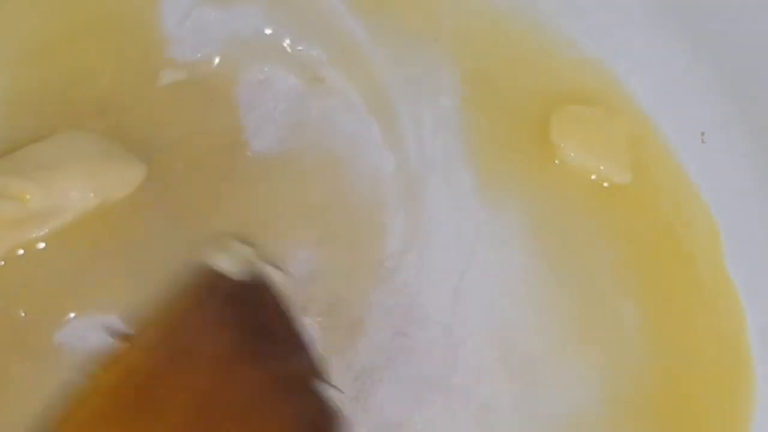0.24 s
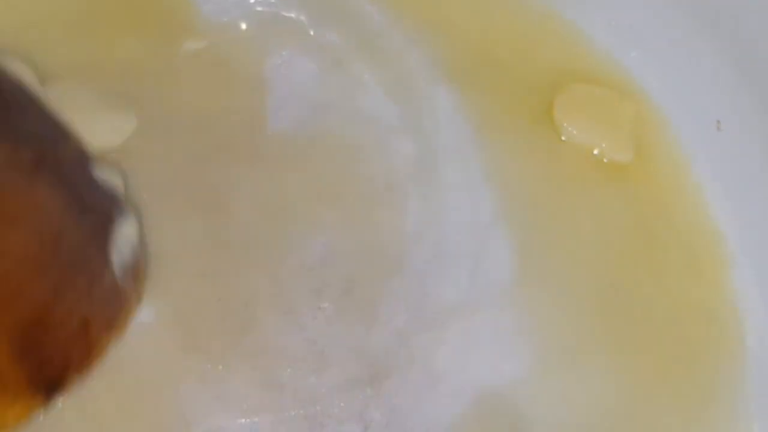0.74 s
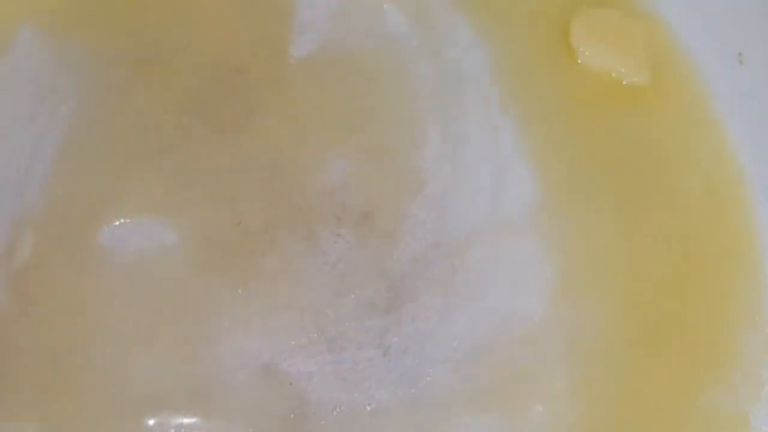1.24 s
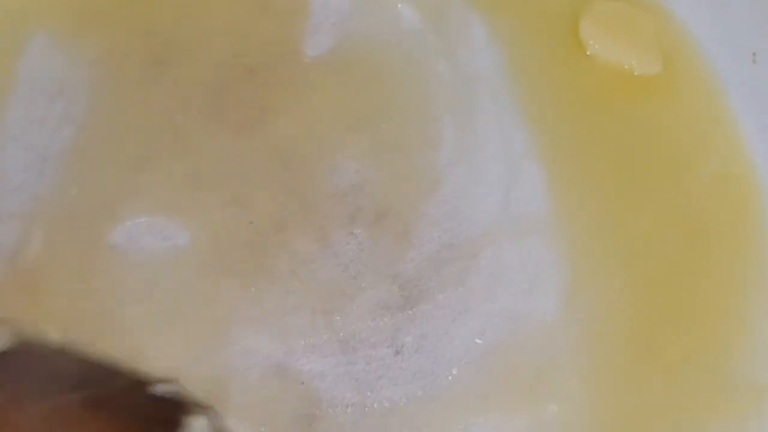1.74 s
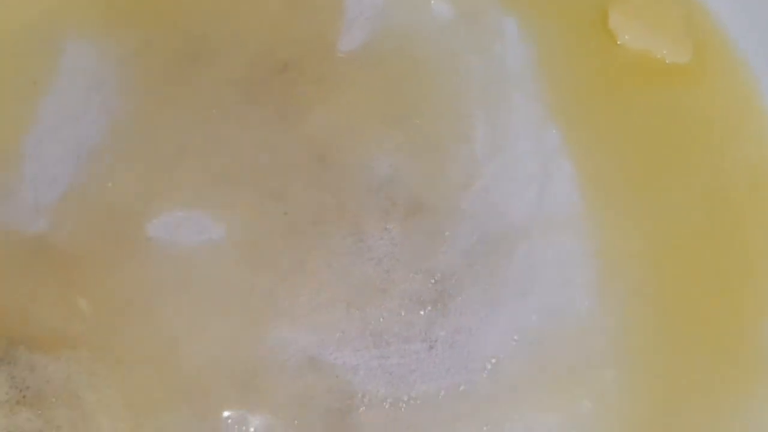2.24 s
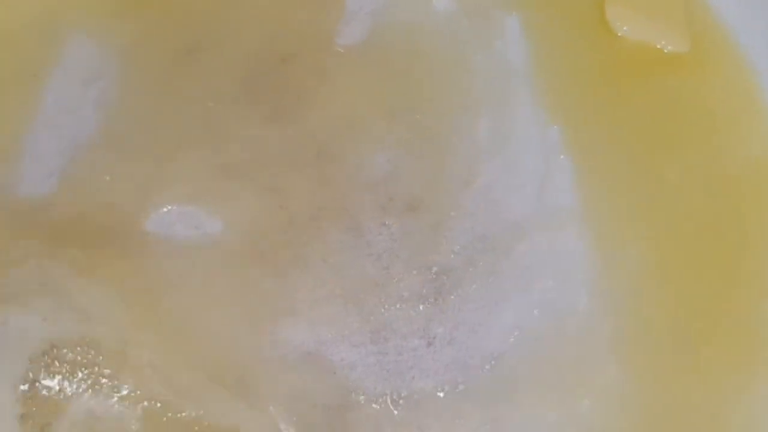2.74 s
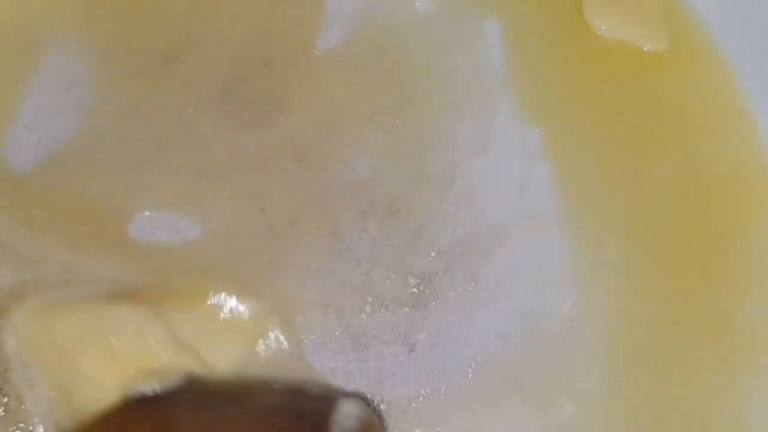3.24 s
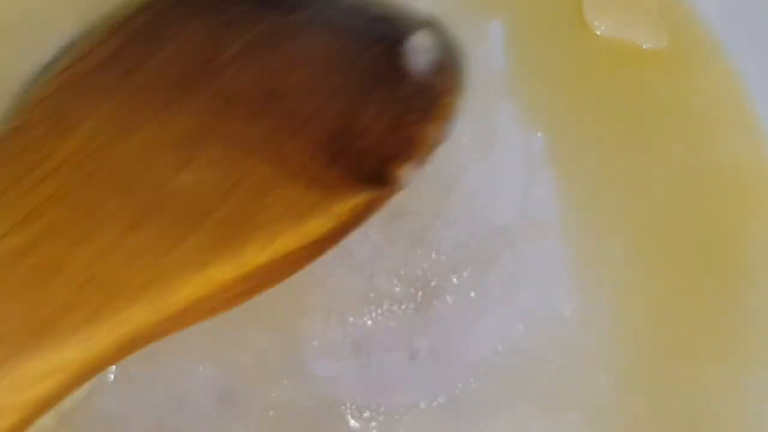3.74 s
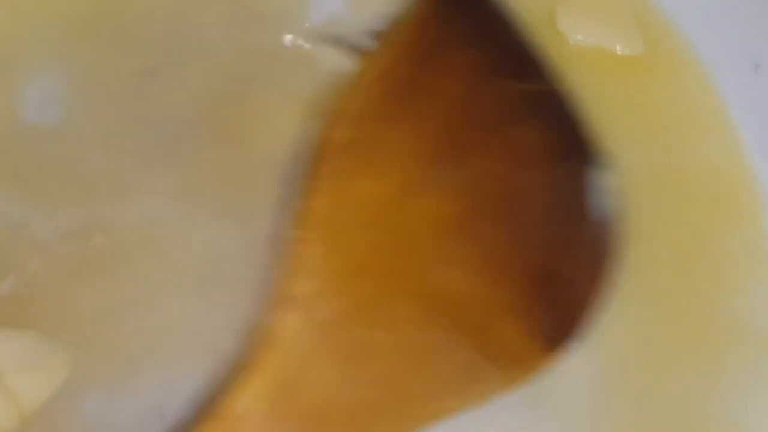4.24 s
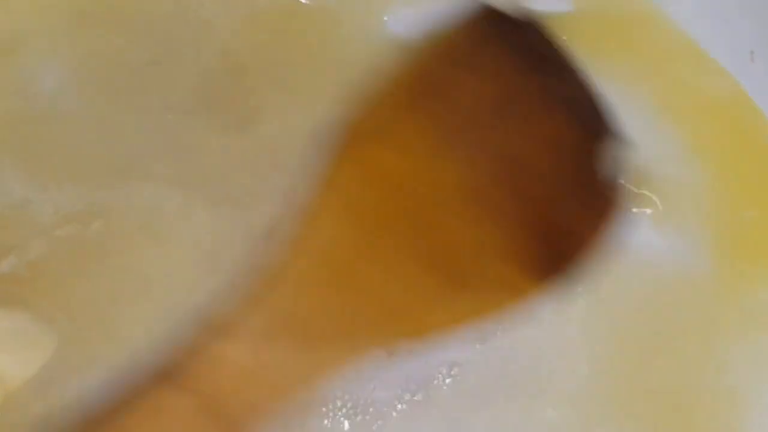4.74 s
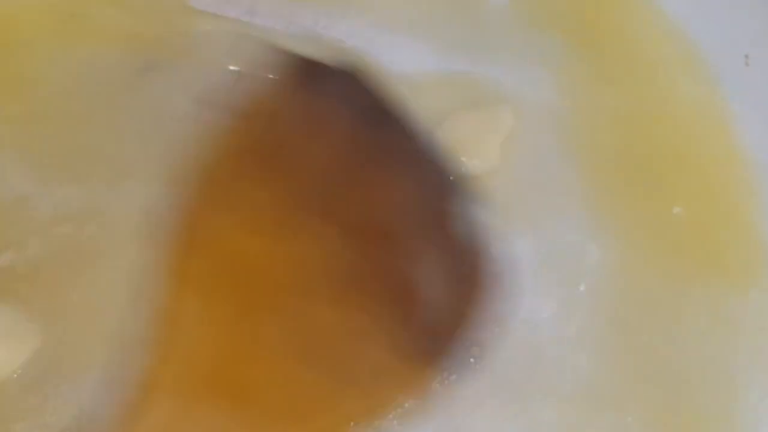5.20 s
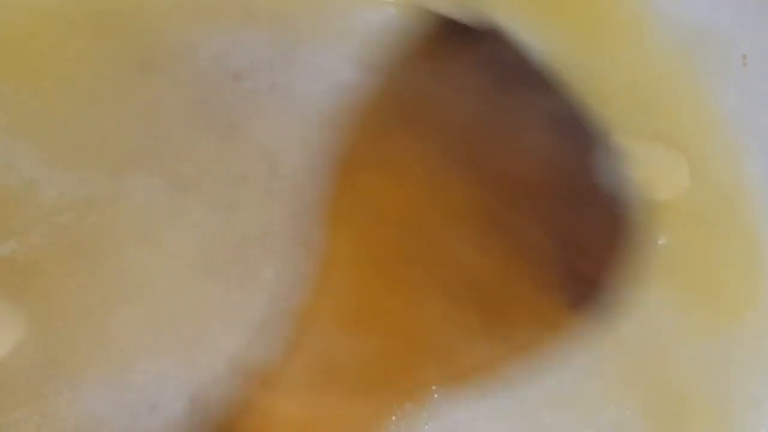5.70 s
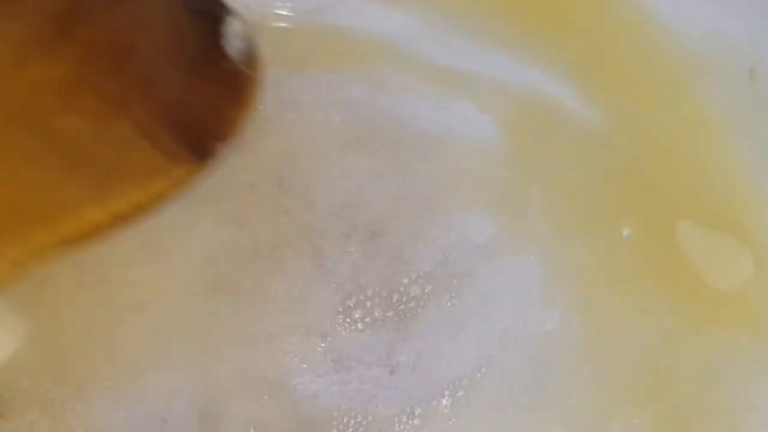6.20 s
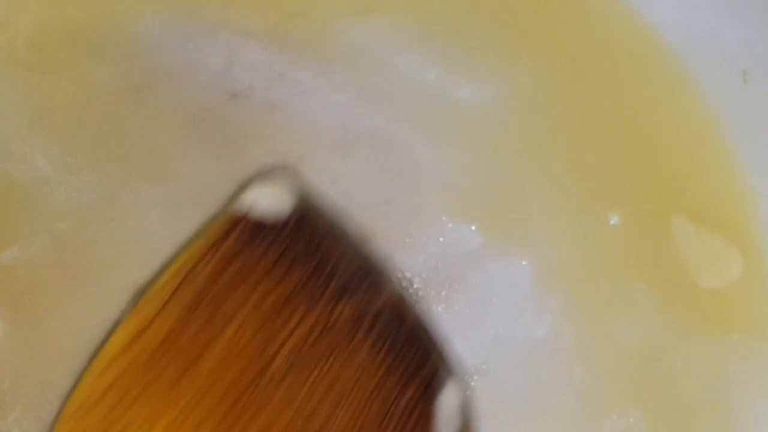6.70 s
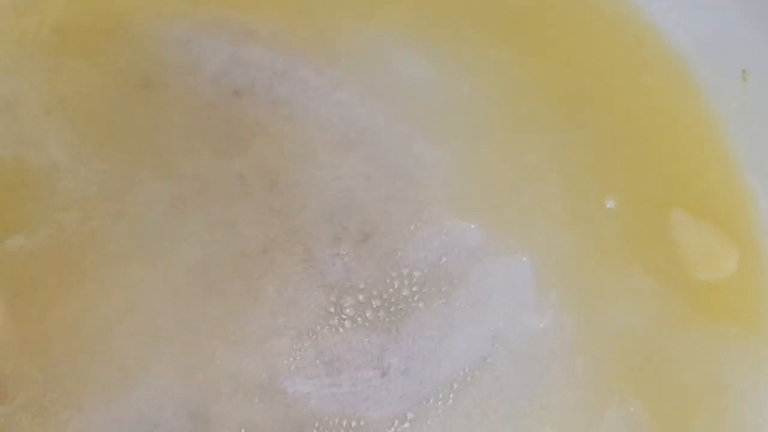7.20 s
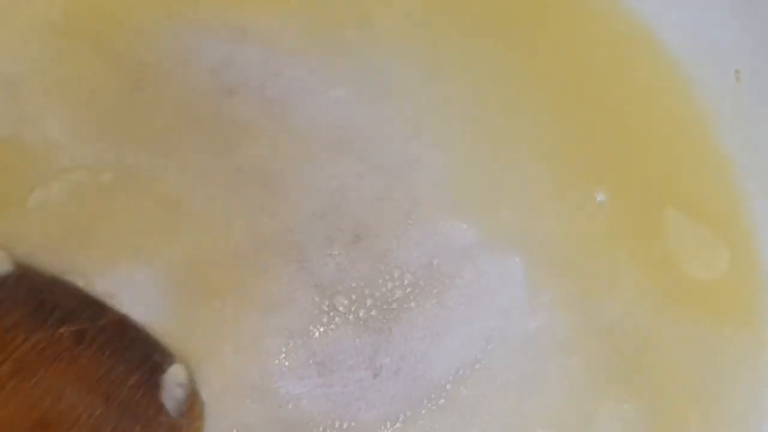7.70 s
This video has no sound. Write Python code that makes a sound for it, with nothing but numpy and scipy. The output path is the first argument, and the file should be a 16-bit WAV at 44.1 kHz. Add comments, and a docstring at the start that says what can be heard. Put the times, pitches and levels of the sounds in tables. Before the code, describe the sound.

Close stereo pickup in a kitchen: a wooden spoon gives short scrapes, then sharp knocks on a pan bottom every third of a second or so, each with a brief damped metallic ring. Soft low floor thuds follow in the middle. Then come quick, regular scraping strokes while stirring, and finally fizzing, ticking fat and a few last knocks. A faint wavering appliance hum and low rumble continue throughout.

```python
"""A wooden spoon knocks on and scrapes across the bottom of a pan of melting butter, close to a stereo camera.
Each knock is a wooden click and thock, the decaying modes of the pan and a burst of grit; the kitchen answers.
Scrapes, and near the end fizzing fat, are shaped noise in strokes and stretches, with a thin squeak along.
The fat ticks as bubbles burst (short rings and snaps), and low thuds come through the floor (decaying modes).
Behind them is shaped noise: room air and the wavering lines of an appliance, with bass that swells and sinks."""
import sys
import numpy as np
from scipy import signal
from scipy.fft import rfft, irfft
from scipy.io import wavfile
from scipy.ndimage import uniform_filter1d

SR = 44100
rng = np.random.default_rng(int(sys.argv[2]) if len(sys.argv) > 2 else 0)


def output_pcm(signal):
    """Save a mono or channel-first signal as 16-bit PCM at the path in sys.argv[1].

    Samples are clipped to [-1, 1] before scaling.
    """
    pcm = np.clip(np.atleast_2d(signal).T, -1, 1) * 32767
    wavfile.write(sys.argv[1], SR, np.round(pcm).astype(np.int16))


N = 350771
LOWEST_HZ, MIDDLE_HZ, UPPER_HZ = 385, 1100, 2800  # where each knock has its own drive of the pan

# likeness of the left and right ports: hz, likeness (1 the same, 0 unrelated)
LIKENESS = [(25, .7), (60, 1), (180, 0.94), (550, .8), (1000, 0), (1650, 0.093), (15000, 0)]
# strokes of the spoon, and near the end stretches of fizzing fat: start_s of full strength,
# hold_s at full strength, relative hiss_db, rub_db (drive of the pan's resonances), treble_db
STROKES = [(.015, 0.018, -59, -14, 2), (0.107, 0.042, -53, 10.5, 2.5), (.2, 0.039, -52.5, 14, -3.5),
           (.24, 0.015, -66, 5, 3), (.512, 0.01502, -58.5, -5.5, 4.5), (.55, .07, -59.5, 9, -3),
           (0.951, 0.059, -59, -1, 5.5), (1.29, 0.06, -59, 16, -1.5), (1.66, 0.16, -63, -5, -24),
           (2.12, 0.39, -67.5, -4, 6.5), (2.52, 0.052, -58, 13, -2), (2.66, 0.23, -63, 3.5, 5.5),
           (2.92, .16, -62.5, 4, 1), (3.2, 0.12, -71.5, -7.5, 1.5), (3.7, .25, -73, -9, -1.5),
           (3.98, 0.035, -66.5, -10, 0.5), (4.099, 0.035, -53.5, 10.5, -2), (4.4, .03, -66, 16, 6),
           (4.49, 0.042, -60, 5, 4.5), (4.608, 0.024, -54.5, 13.5, -0.5), (4.69, 0.06, -60, 6, -5),
           (4.789, 0.029, -50, 7.5, -1.5), (4.915, 0.025, -53.5, 10.5, -0.5), (5.057, 0.043, -51, 9, 2),
           (5.198, 0.03, -53.5, 10.5, 0.5), (5.347, 0.025, -48.5, 7.5, 1), (5.478, 0.036, -53, 7, -1.5),
           (5.629, 0.021, -51.5, 7.5, -0.5), (5.76, 0.047, -57.5, 1, -0.5), (5.895, 0.033, -52, 7.5, 2),
           (6.015, 0.058, -54, 14, 0), (6.158, 0.032, -49.5, 6.5, 2.5), (6.308, 0.0099, -49, 8, 1.5),
           (6.416, 0.024, -47, 6, 2), (6.526, 0.013, -50, 11.5, 1.5), (6.62, .1, -67.5, 0.5, -8),
           (7.12, .15, -66.5, -17, -5), (7.33, 0.042, -62, 8, 3.5), (7.45, .2, -70, -6, 1.5),
           (7.7, .15, -62.5, 0, -6)]


def gain_of(db):
    """Decibels to an amplitude factor."""
    return 10 ** (np.asarray(db) / 20)


def evened(x):
    """Scale to an rms of one."""
    return x / np.sqrt(np.mean(x ** 2) + 1e-20)


def read(points, hz):
    """Read a curve of (hz, value) points, straight between them over log frequency."""
    f, value = np.transpose(points)
    return np.interp(np.log(hz + 1), np.log(f + 1), value)


def add(mix, s, sound):
    """Lay a sound into the mix at s seconds, cut off at the end."""
    part = mix[:, max(round(s * SR), 0):][:, :sound.shape[1]]
    part += sound[:, :part.shape[1]]


def bumps(peaks, hz):
    """Summed power of resonances given as (hz, width_hz, db)."""
    return sum(gain_of(db) ** 2 / (1 + (2 * (hz - f) / width) ** 2) ** 2 for f, width, db in peaks)


def partner(first, other, same):
    """Mix in an unrelated signal so that the second port is like the first by the share `same`."""
    return same * first + np.sqrt(1 - same ** 2) * other


def noise(gain, size, patchy_db):
    """Two-port noise from random short-time spectra; gain(hz, s) shapes it, patches drift over it."""
    frames = 4 * N // size + 5
    hz = np.fft.rfftfreq(size, 1 / SR)[:, None]
    a, b, c, d, patches = rng.standard_normal((frames, len(hz), 5)).T
    patches = uniform_filter1d(patches, size // 100, axis=0)  # smooth over frequency, then over time
    patches = evened(uniform_filter1d(patches, 10000 // size, axis=1))
    same = np.clip(read(LIKENESS, hz), -1, 1)
    left = a + 1j * b
    spectra = np.array([left, partner(left, c + 1j * d, same)])
    spectra *= gain(hz, np.arange(frames) * size / 4 / SR) * gain_of(patchy_db * patches)
    return signal.istft(spectra, nperseg=size, noverlap=3 * size // 4)[1][:, :N]


def ring(hz, t60, t, phase=0):
    """A mode struck at time zero, a sine that falls 60 dB in t60 seconds."""
    return (t > 0) * gain_of(-60 * abs(t) / t60) * np.sin(2 * np.pi * hz * t + phase)


def hum():
    """Room air with the wavering lines of an appliance; the bass swells and sinks."""
    # spectrum of the room air: hz, relative level_db
    air = [(15, -44), (32, -17), (45, -6), (100, -5.5), (180, -17), (330, -11.5), (420, -19), (1200, -27.5),
           (2050, -32.5), (2350, -39.5), (3900, -43.5), (4800, -33.5), (7300, -36.5), (8400, -47),
           (11000, -40), (15700, -43.5), (16000, -72)]
    # lines of the appliance: hz, width_hz, level_db over the air
    lines = [(49, 10, 6), (102.2, 18, 12.5), (150.4, 8.8, 12), (203.1, 17, 9.5), (239.6, 19, 8.5),
             (294.4, 20, 7.5), (336, 9.2, -4.5), (575, 90, 0.5), (1840, 203, 4.5)]
    # swell of the bass, used about its mean: time_s, level_db
    rumble = [(0.0, -52), (0.5, -51.5), (0.91, -50.5), (1.22, -57), (1.62, -50), (1.97, -56.5), (2.41, -50),
              (3.23, -51.5), (3.45, -58.5), (3.72, -52.5), (4.32, -52), (5.09, -54), (5.62, -54.5),
              (5.89, -54), (6.9, -57), (7.22, -55), (7.79, -53), (7.95, -56)]
    s, db = np.transpose(rumble)

    def gain(hz, t):
        swell_db = (np.interp(t, s, db) - np.mean(db)) / (1 + (hz / 900) ** 2)
        # the deepest rumble is stronger on the left
        lean_db = np.reshape([1., -1.], (2, 1, 1)) * 1.2 / (1 + (hz / 90) ** 2)
        return gain_of(read(air, hz) + swell_db + lean_db) * np.sqrt(1 + bumps(lines, hz))

    return gain_of(-48.5) * evened(noise(gain, 4096, 0.43))


def thud(row):
    """A soft low blow through the floor that the room holds for a moment, with a dull rattle on top."""
    s, level_db, hz = row
    t = np.arange(SR // 2) / SR
    body = ring(hz, 0.091, t) + .5 * ring(1.506 * hz, 0.23, t) + 0.15 * ring(0.92 * hz, 1.0, t)
    band = signal.butter(2, [180, 800], "band", fs=SR)
    rattle = signal.lfilter(*band, rng.standard_normal((2, len(t))))
    rattle = rattle + 0.54 * rattle.sum(0)  # draws the two ports together
    rattle = evened(rattle) * gain_of(-24.5 - 60 * t / 0.23)
    soft_onset = 1 - np.exp(-t / 0.0077)
    return s, gain_of(level_db) * (body + rattle) * soft_onset


def kitchen(x):
    """Sparse echoes of random sign, each band dying at its own speed; the ports share the bass."""
    # decay of the kitchen: hz, t60_s
    decay = [(250, 0.403), (600, 0.54), (1500, 0.32), (3000, 0.28), (6000, 0.11), (12000, 0.65)]
    taps = np.zeros((2, SR // 2))
    slots = np.arange(200, SR // 2 - 20, 20)  # one tap in every 20 samples
    at = slots + rng.integers(0, 20, (2, (SR // 2 - 201) // 20))
    np.put_along_axis(taps, at, rng.choice([-1., 1.], at.shape), 1)
    hz, t, (a, b) = signal.stft(taps, SR, nperseg=256)
    same = np.clip(read(LIKENESS, hz), -1, 1)[:, None]
    spectra = np.array([a, partner(a, b, same)])
    fade = gain_of(-60 * t / read(decay, hz)[:, None])
    tail = signal.istft(spectra * fade, SR, nperseg=256)[1]
    return signal.fftconvolve(x, tail / np.linalg.norm(tail[0]), axes=1)[:, :N]


def tick(row):
    """A bubble in the fat bursts: a short ring and a thin, bright snap."""
    s, level_db, hz, sharp_db, left_right_db = row
    t = np.arange(800) / SR
    snap = evened(np.diff(rng.standard_normal(len(t) + 3), 1)[2:])  # differencing thins the noise
    snap = snap * gain_of(sharp_db + 0.5 - 60 * t / .003)
    bubble = gain_of(-3.) * ring(hz, .0035, t) * (1 - np.exp(-t / .0002))
    level = gain_of(level_db + np.array([[.5], [-.5]]) * left_right_db)
    return s, level * (snap + bubble)


def ports(x):
    """The camera body shades each port differently, and the right one is farther from the pan."""
    # lean of sound from the pan's side: hz, left_right_db
    lean = [(60, 0), (300, 3.5), (700, 3.5), (1300, -0.5), (2400, -1), (4300, -7.5), (6000, -5.5),
            (8100, 1), (15000, -1.5)]
    lag_samples = 13
    hz = np.fft.rfftfreq(2 * 256, 1 / SR)
    side = np.array([[.5], [-.5]])
    lag = lag_samples * hz ** 2 / (hz ** 2 + 450 ** 2)  # long waves wrap round the body, almost together
    response = gain_of(side * read(lean, hz)) * np.exp(2j * np.pi * side * lag * hz / SR)
    taps = np.roll(irfft(response), 256, axis=1)
    return signal.oaconvolve(x, taps, axes=1)[:, 256:256 + N]


def sliding(t):
    """Power of each stroke or stretch of fizz over time: it rises, holds and falls."""
    # it is 10 dB down this long before and after the hold, plus a share of the hold:
    # half the coast share before it, the whole share after it
    rise_s, fall_s, coast = 0.028, 0.045, 0.1
    start, hold, hiss_db = np.transpose(STROKES)[:3, :, None]
    hold = abs(hold)
    early = np.maximum(start - t, 0) / (rise_s + .5 * coast * hold)
    late = np.maximum(t - start - hold, 0) / (fall_s + coast * hold)
    return gain_of(hiss_db - 10 * (early + late) ** 1.5) ** 2


def squeak():
    """One mode of the pan keeps singing along with the hiss, thin and unsteady."""
    mode_hz, width_hz, level_db = 2470, 70, -20.5  # level against the hiss_db of the strokes
    t = np.arange(N) / SR
    coarse = t[::128]
    unsteady = evened(uniform_filter1d(rng.standard_normal(len(coarse)), 24))
    strength = np.sqrt(sliding(coarse).sum(0)) * gain_of(6. * unsteady)
    r = np.exp(-np.pi * width_hz / SR)
    # slow complex noise, carried up to the mode's pitch
    waver = signal.lfilter([1], [1, -2 * r, r ** 2], rng.standard_normal((N, 2)) @ [1, 1j])
    song = evened((waver * np.exp(2j * np.pi * mode_hz * t)).real)
    return song * gain_of(level_db) * np.interp(t, coarse, strength)


def scrape():
    """Wood on greased metal hisses and drives broad pan resonances; late fizz of the fat uses the same noise."""
    # spectrum of the hiss: hz, relative level_db
    hiss_curve = [(2060, -30), (3500, -12), (4500, -5), (5580, -8), (6960, -3), (8100, -12.5), (9540, -8.5),
                  (11000, -4), (13600, -6.5), (15000, -5), (15800, -24.5)]
    # resonances of the pan under the edge: hz, width_hz, relative level_db
    rub_peaks = [(2734, 350, -13.5), (3240, 300, -10.5), (1900, 220, -12.5), (800, 1500, -14.5)]
    treble_hz = 8640  # where the treble of the hiss begins
    rub_lag_s = 0.0075  # the resonances follow the hiss by this much
    rub_db, treble_db = np.transpose(STROKES)[3:]
    # the resonances sit a little apart from row to row
    shift = 1 + .05 * rng.standard_normal(len(STROKES))

    def gain(hz, t):
        shelf_db = treble_db / (1 + (treble_hz / (hz + 1)) ** 6)
        hiss = gain_of(read(hiss_curve, hz) + shelf_db) ** 2
        rub = bumps(rub_peaks, hz * shift) * gain_of(rub_db) ** 2
        return np.sqrt(hiss @ sliding(t) + rub @ sliding(t - rub_lag_s))

    grain = gain_of(1.7 * evened(uniform_filter1d(rng.standard_normal(N), 130)))  # uneven level
    rasp = noise(gain, 512, 2.3)
    return gain_of(-11.5) * grain * rasp


def knock(row):
    """The spoon clicks and thocks; the pan rings in the modes that this spot of the bottom drives."""
    # modes of the pan, before damping and splitting: hz, relative level_db, t60_s
    modes = [(314, -21, .2), (386.1, 7.5, 0.3), (524, -0.5, 0.17), (633, 5.5, 0.24), (787, -1, 1),
             (856, 3, 0.23), (974, 1, 0.2), (1130, -2, 1), (1326, 4.5, .22), (1490, -6, .22),
             (1570, -15, 0.29), (1806, 3.5, 0.22), (1702, 2, .2), (1987, -0.5, .2), (1986, 2, 0.073),
             (2140, 0, 0.84), (2330, -18.5, 0.15), (2580, -1, 0.6), (2370, 6.5, 0.16), (2538, -5, 0.3),
             (2750, -3, 0.22), (3210, -11, 0.25), (3343, -12.5, 0.15), (3520, -1.5, 0.082),
             (4110, -12.5, .25), (4450, -20, 0.083), (4820, -15, 0.095), (4770, -6, 0.18),
             (6900, -8.5, .13), (6900, 4.5, 0.0426)]
    # how the dense high modes reach the camera: hz, level_db
    sheen = [(200, -31.5), (340, -9.5), (450, -4.5), (1100, 0), (2250, 1.5), (2600, -4), (3600, -9),
             (4500, -1.5), (5700, -0.5), (7200, 4.5), (8200, -1), (11000, 3.5), (16000, -10.5)]
    # how a blow drives the pan: hz, flat_db for the flat bowl, edge_db for the edge
    blow_curve = [(600, -11, -18), (MIDDLE_HZ, -7.5, -19), (1850, -17.5, -15), (UPPER_HZ, -35, -11),
                  (5000, -52.5, -11), (10000, -63, -26.5)]
    lead_s = 0.002  # the grit swells for 2 ms before the click
    longest_s, split_share = .24, .009  # butter damps every ring; the uneven bottom splits each mode
    (s, blow_db, hard, low_db, middle_db, upper_db,
     click_hz, click_db, tip_hz, thock_hz, thock_db) = row
    drive = [(LOWEST_HZ, low_db)]
    for f, flat_db, edge_db in blow_curve:
        extra_db = middle_db * (f == MIDDLE_HZ) + upper_db * (f == UPPER_HZ)
        drive.append((f, flat_db + hard * (edge_db - flat_db) + extra_db))
    t = np.arange(SR // 3) / SR
    late = t - lead_s
    after = np.maximum(late, 0)

    hz, db, t60 = np.tile(np.transpose(modes), 3)  # each mode splits in three
    spot, turn, split = rng.standard_normal((3, len(hz)))
    hz = hz * (1 + split_share * split * np.clip(hz / 900, .5, 1))
    t60 = np.minimum(t60, longest_s * (1 + (170 / hz) ** 2))
    skew = turn * np.clip(hz / 2500, 0, 2)  # each mode radiates its own way, so the ports differ in phase
    sizes = gain_of(db + read(drive, hz) + 2.7 * spot - 15.5) * np.exp(1j * np.outer([-.5, .5], skew))
    spins = np.exp(np.outer(2j * np.pi * hz - np.log(1000) / t60, after))
    pan = (sizes @ spins).imag * np.tanh(after / .003)

    # noise stands for the dense high modes
    f = np.fft.rfftfreq(len(t), 1 / SR)
    shape = gain_of(read(drive, f) + read(sheen, f))
    a, b = rfft(rng.standard_normal((2, len(t)))) * shape / np.sqrt(f + 50)
    same = np.clip(read(LIKENESS, f), .4, 1)
    grit = irfft([a, partner(a, b, same)], len(t))
    burst = gain_of(3.0 - 60 * abs(late) / 0.016)  # a short swell of noise, then its fall
    tail = gain_of(-14.5 - 60 * late / 0.074) + gain_of(-11.0 - 60 * late / 0.22)
    grit = gain_of(47.0) * grit * (burst + (late > 0) * tail)

    click = gain_of(click_db + 14.5) * ring(click_hz, .013, late)
    tip = gain_of(read(drive, tip_hz) + 13.0) * ring(tip_hz, .012, late)
    click = (click + tip) * np.tanh(late / 0.00031)
    # the spoon's bowl, a dull wooden mode
    thock = gain_of(thock_db + 7.5) * ring(thock_hz, 0.049, late) * np.tanh(late / .001)
    return s, gain_of(blow_db) * (pan + grit + click + thock)


def scene():
    """Pan and spoon through the camera's ports, with ticks, thuds, echoes and the room behind."""
    # knocks: start_s, relative blow_db, hardness (0 flat bowl, 1 edge), low_db (drive of the lowest mode),
    # middle_db and upper_db (extra drive near 1 and 3 kHz), click_hz, click_db, tip_hz, thock_hz, thock_db
    knock_rows = [(0.007, -34.5, 0, 2.5, -4.5, -1, 1410, -26, 5400, 640, -12),
                  (0.486, -10.5, 0.91, -18.5, 5, 1.5, 3150, -7.5, 4430, 562, -14.5),
                  (0.663, -37, 0.75, -21, 6, -1.5, 1230, -16.5, 4970, 490, -29),
                  (0.903, -31.5, 0.38, -16, 3.5, 2, 1400, -26, 4440, 540, -1.5),
                  (1.247, -16, 0.87, -15.5, -2.5, 2.5, 2070, -35, 4565, 767, -25),
                  (1.253, -19.5, 0.4, -9, -3, 5, 2760, -12.5, 4340, 560, -11.5),
                  (1.604, -15.5, 1.016, -44, -8, 3.5, 1590, -3.5, 5110, 900, -16),
                  (1.656, -35.5, .7, -6.5, -4, 11, 1700, -26, 4180, 492, 2.5),
                  (2.087, -23.5, 1.054, -13.5, 1, -1, 2340, -6.5, 4230, 490, -21),
                  (2.479, -21.5, 0.94, -13, -2.5, -5.5, 2240, -10.5, 6840, 506, -22.5),
                  (2.866, -19.5, 0.93, -17.5, -3, 2, 1570, -17, 4940, 663, -55),
                  (4.061, -22, 0.62, -23.5, 1, 4.5, 1900, -8.5, 4950, 560, -9),
                  (4.408, -38.5, 0.3, -12.5, 8, -16, 1250, -22, 6700, 570, -2.5),
                  (4.682, -49.5, 0.93, -30, -13, 16, 2580, -1, 3790, 473, -29),
                  (4.992, -49.5, .6, -8, -12, 3, 2100, 1, 5280, 530, -21.5),
                  (7.31, -27, 0.3, -13.5, 1, -1.5, 1180, -28, 4670, 496, -1),
                  (7.69, -25.5, 0.69, -9, 3, -4, 1500, -13, 5420, 492, -1),
                  (7.938, -12.5, 0.65, -23, 1.5, 4.5, 1690, -29, 4440, 476, -4)]
    # ticks of the hot fat: start_s, level_db, pitch_hz, sharpness_db, left_right_db
    tick_rows = [(0.0872, -37, 12500, -6, -11), (0.4544, -40, 7100, -27, -7), (0.463, -36, 4700, -33, -3),
                 (1.7899, -34.5, 5250, -17, -5.5), (1.9428, -45, 6640, -16.5, -10),
                 (2.8439, -31, 5030, -30, 0), (3.5936, -46.5, 5780, -7, -9),
                 (3.8977, -41, 6770, -14, -13.5), (3.9786, -33, 6730, -1, -10),
                 (4.3131, -41, 11900, 1.5, -7.5), (4.7362, -34, 4690, -18, -9), (5.129, -38, 4970, -15, 1),
                 (5.5244, -41, 4680, -23, -3.0), (5.771, -24, 13100, -7.5, 11),
                 (5.784, -39, 4590, -14, -1.0), (5.8581, -47, 12300, -5, -6),
                 (6.6403, -41.5, 13100, -21, -13), (6.969, -41, 6670, -23.5, -7.5),
                 (7.1068, -39.5, 7260, -6.5, -9.5), (7.119, -36.5, 4900, -22, -18.5),
                 (7.1432, -32, 6740, -4, -12), (7.2, -34.5, 6900, -8.5, -8), (7.496, -44, 6900, -12, 2.5),
                 (7.5157, -34.5, 6520, -12.5, -2.0), (7.605, -45, 11300, 1, 0),
                 (7.644, -37, 10500, -14.5, -13), (7.7089, -29, 5270, -7, 6), (7.7416, -40, 9100, -15, 5),
                 (7.7526, -31, 11800, -5, -11), (7.7944, -36, 13200, -6, -2)]
    # low thuds through the floor: start_s, level_db, pitch_hz
    thud_rows = [(2.285, -25.5, 89.6), (2.733, -27, 94.6), (3.177, -27.5, 83.3), (3.632, -26.5, 89.4),
                 (4.107, -30, 92.7)]
    knocks, ticks = np.zeros((3, 2, N)), np.zeros((2, N))
    for k, row in enumerate(knock_rows):
        add(knocks[k % 3], *knock(row))  # the spoon lands in changing places, so the echoes change too
    for row in tick_rows:
        add(ticks, *tick(row))
    near = ports(knocks.sum(0) + scrape()) + ticks + squeak()
    for row in thud_rows:
        add(near, *thud(row))
    echoes = gain_of(-5.0) * sum(kitchen(x) for x in knocks) + gain_of(-14.0) * kitchen(ticks)
    return near + echoes + hum()


def record(dry):
    """The input stage rounds off the hardest blows; then the band limit of the recorder."""
    rounded = .96 * np.tanh(dry / .96)
    band_limit = signal.firwin(1023, 16550, window=("kaiser", 9), fs=SR)  # low-pass edge in Hz
    return signal.oaconvolve(rounded, band_limit[None], "same", axes=1)


dry = scene()
out = record(dry)
output_pcm(out)
```